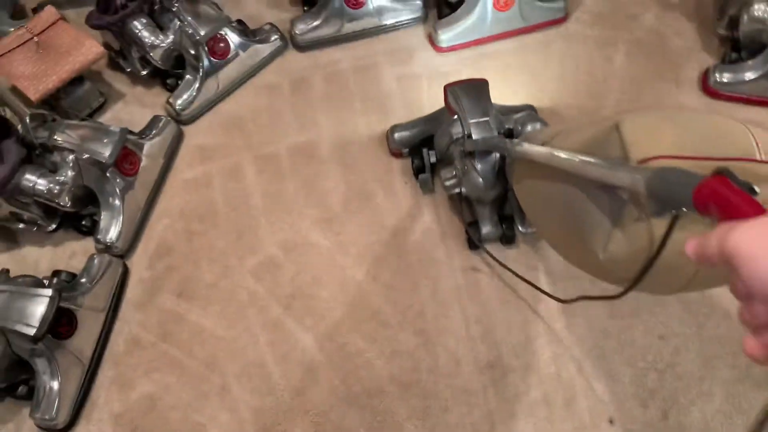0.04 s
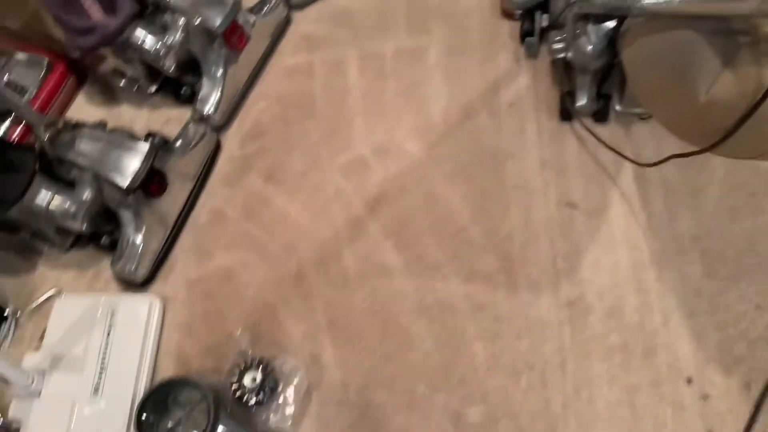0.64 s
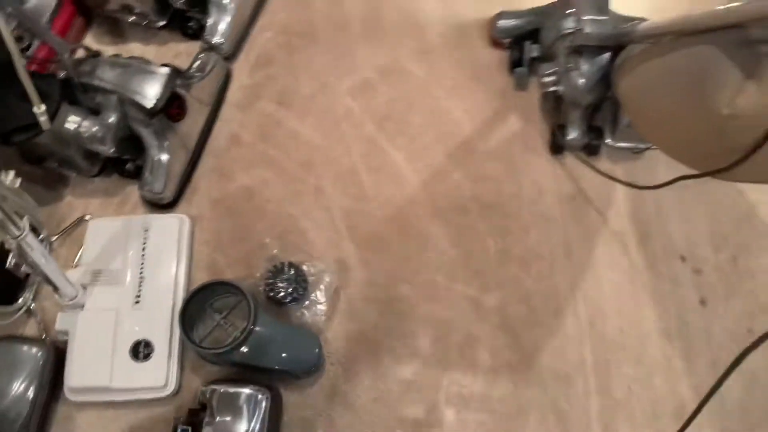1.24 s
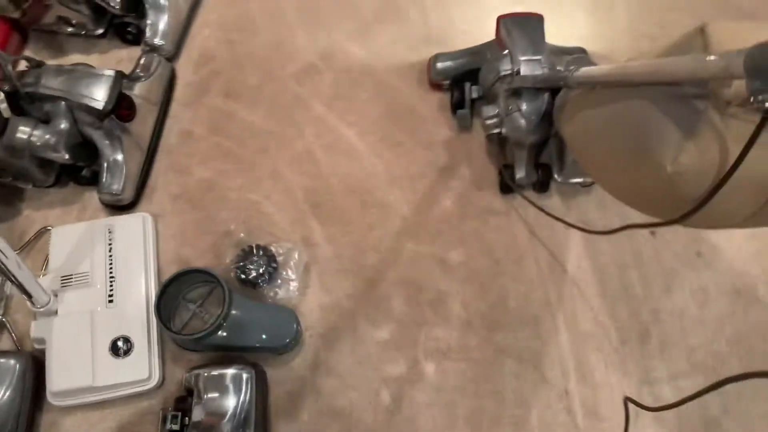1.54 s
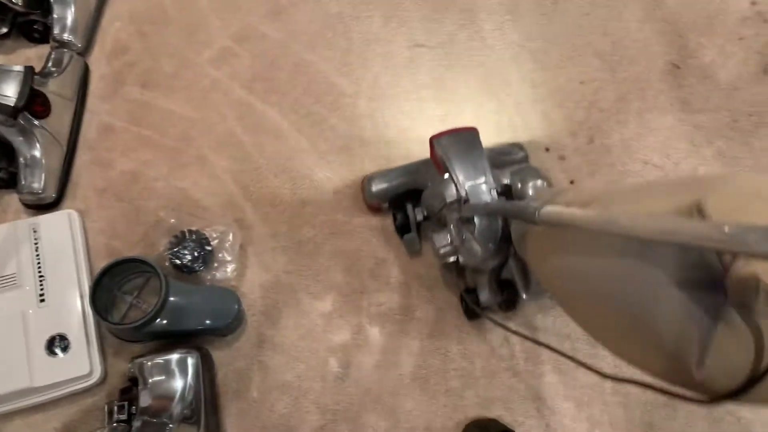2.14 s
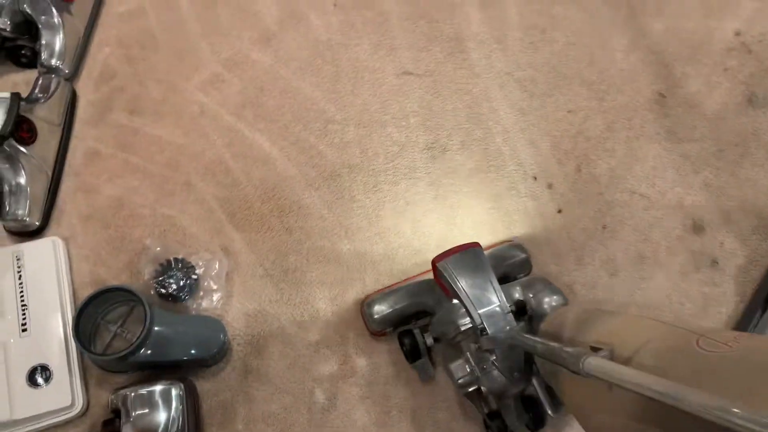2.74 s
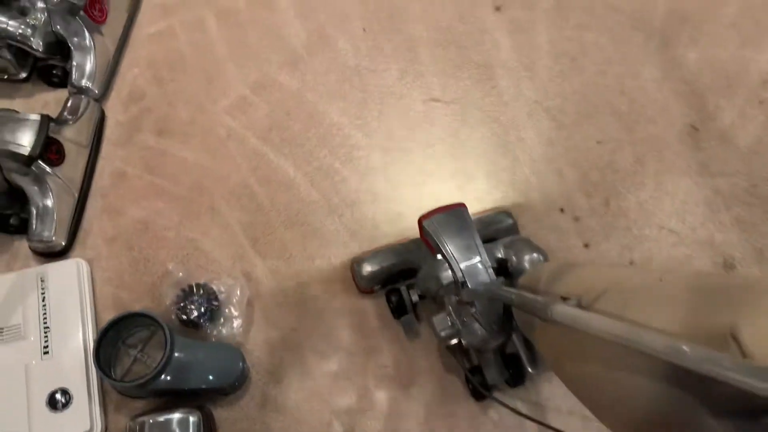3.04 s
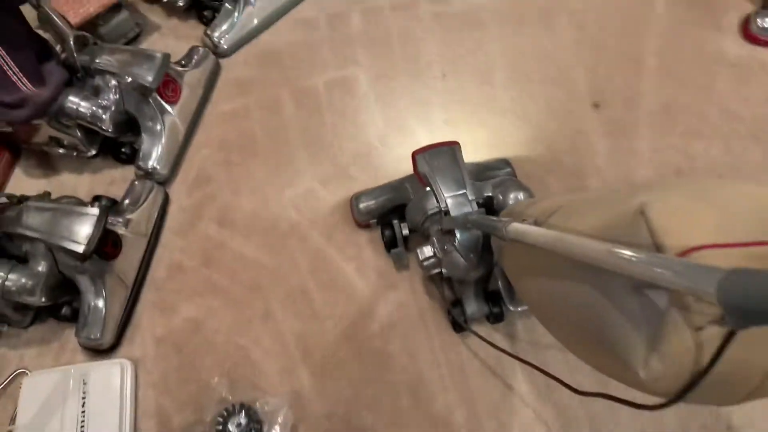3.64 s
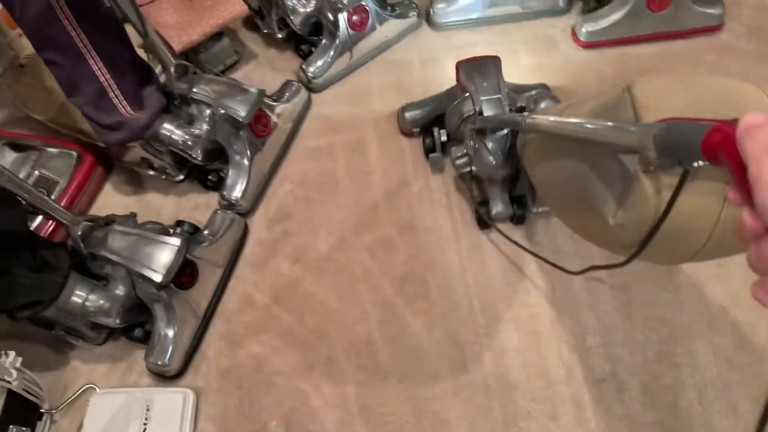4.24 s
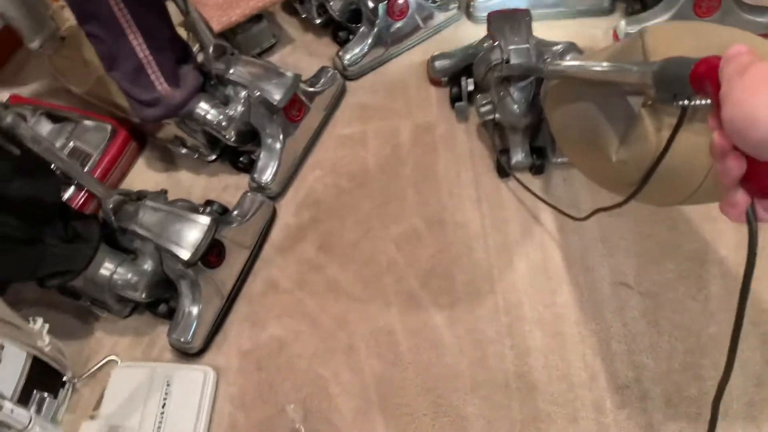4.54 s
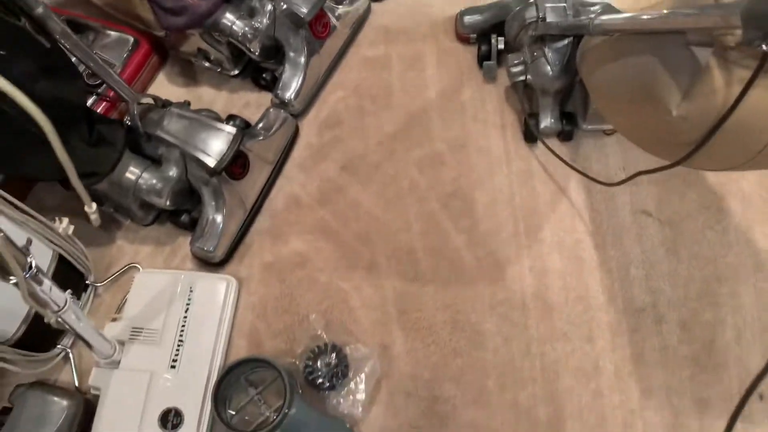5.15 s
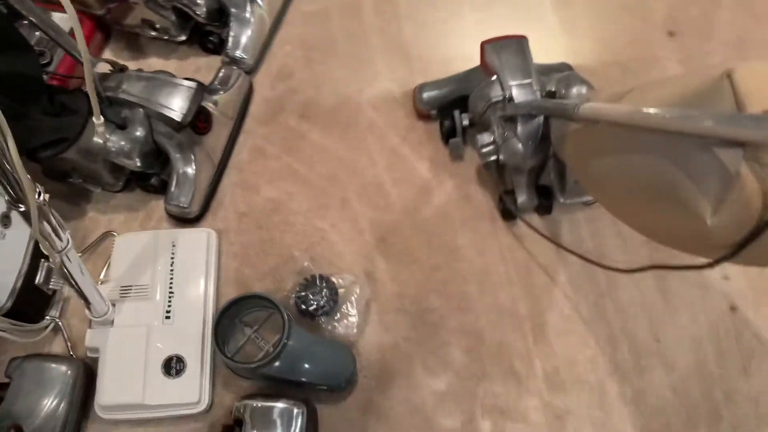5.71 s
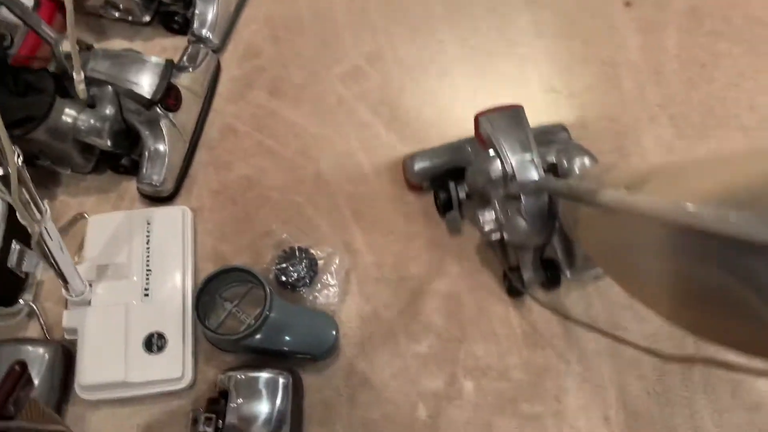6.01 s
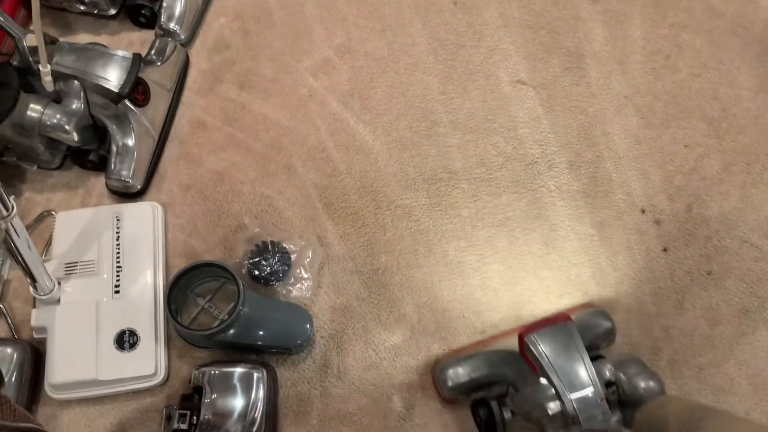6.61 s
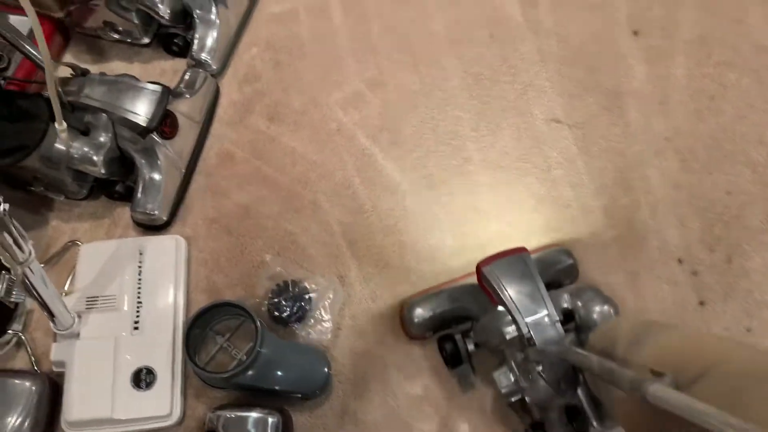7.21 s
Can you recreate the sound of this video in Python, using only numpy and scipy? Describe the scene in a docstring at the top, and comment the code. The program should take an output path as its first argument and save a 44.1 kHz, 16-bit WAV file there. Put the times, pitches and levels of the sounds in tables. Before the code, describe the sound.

An upright vacuum cleaner runs without a break on carpet indoors. A broad roar of rushing air and hiss carries a high, buzzing motor whine, a fan whistle and a faint low hum. The machine is slowly pushed away and drawn back twice; the tones swell and fade and the pitch sags very slightly as it travels. It is heard close up in stereo, from above, where the person steering would stand.

```python
"""An upright vacuum cleaner on carpet, pushed out to arm's length and drawn back to the feet, twice.
Indoors, close up, with a stereo microphone overhead, where the person steering it would hear it.
Air roars through nozzle, fan housing and bag. The motor whines, throbbing with the mains, and slows
a little as the carpet loads it; the fan whistles, shaft and brush roll hum below.
As the machine travels, the room favours other resonances and the tones swell and fade."""
import sys
import numpy as np
from scipy import signal
from scipy.io import wavfile

SR = 44100
rng = np.random.default_rng(int(sys.argv[2]) if len(sys.argv) > 2 else 0)


def materialize(psi):
    """Save the field psi as 16-bit PCM at rate SR to the path in sys.argv[1].

    A 1-D psi becomes a single channel; in a 2-D psi each row is a channel.
    """
    bounded = np.clip(np.atleast_2d(psi).T, -1, 1)
    quanta = np.round(bounded * 32767).astype(np.int16)
    wavfile.write(sys.argv[1], SR, quanta)


N = 325017
TIME = np.arange(N) / SR
SLOTS, BLADES, MAINS_PULSE_HZ = 14, 10, 120

# turning points of the strokes: (time [s], nearness [0 = at arm's length, 1 = at the feet])
STROKE_TURNS = [(-1.4, .6), (.95, .05), (2.85, .83), (5.15, .02), (6.8, .93), (8.8, .1)]
# the motor labours on the push and races on the way back: (time [s], shaft speed [turns/s])
SHAFT_SPEED = [(0.0, 161.64), (0.61, 162.7), (0.99, 164.07), (1.67, 164.57), (2.56, 163.87), (3.02, 160.98),
               (3.52, 160.7), (4.0, 161.26), (4.37, 161.38), (4.76, 161.81), (5.12, 163.44), (5.58, 164.47),
               (6.01, 164.9), (6.53, 163.98), (7.0, 160.9), (7.37, 160.43)]

# bands of the rush that grow louder or softer along the stroke:
# (centre [Hz], width [Hz], nearness [0..1], gain [dB])
POSITION_BANDS = [(258, 36, 0.66, 6), (279.4, 15.4, 0.22, 7.5), (351, 53, 0.77, 3.5), (410, 21, 0.5, 2),
                  (489, 47, 0.16, 5.5), (556, 49, 0.23, -12), (580, 52, 0.092, 7.5), (552, 36, 0.71, 2),
                  (908, 64, 0.81, -11), (1300, 43, 0.62, 7), (1370, 250, 0.5, -5.5), (2325, 70, 0.64, 8),
                  (2630, 130, 0.43, 9), (3380, 1030, 0.69, 5), (3530, 130, .02, -10),
                  (4285, 100, 0.71, 11.5), (5500, 980, 0.099, -5.5), (7250, 330, 0.51, 3),
                  (7040, 440, 0.81, 10.5)]
# likeness of left and right: alike in the bass, alternately alike and opposed in the treble:
# (frequency [Hz], likeness [-1..1])
STEREO_LIKENESS = [(60, .9), (200, .95), (450, .84), (800, .6), (1800, .55), (3200, .25), (4400, .5),
                   (5600, -.3), (6700, .2), (8300, -.92), (9900, .55), (11400, .8), (13300, -.92),
                   (15200, .75)]
# balance of the air at the microphone: (frequency [Hz], left minus right [dB])
STEREO_BALANCE = [(60, 1.5), (220, -1), (600, -1.1), (1800, -0.7), (3000, 0.5), (4400, -2), (5700, -8.5),
                  (7500, 5), (15000, -2)]

# hum of the shaft: (time [s], relative level [dB])
SHAFT_HUM = [(0.0, -42.5), (0.57, -34), (1.71, -36.5), (2.01, -60), (2.73, -41), (2.83, -65), (3.24, -49),
             (3.63, -33.5), (3.89, -51), (4.33, -33), (4.59, -50.5), (4.88, -35), (6.01, -35), (6.11, -47),
             (7.16, -44.5), (7.37, -35)]
# hum of the brush roll, louder close up: (far level [dB], near level [dB])
BRUSH_ROLL = (-57.5, -51)
# tones of the whirr: (multiple of the shaft speed [x]) each
WHIRR_ORDERS = (8, 9, 12, 13)
# strength of each of those tones: (far level [dB], near level [dB])
WHIRR_LEVELS = [(-49, -46), (-43, -53), (-55, -56), (-57, -59)]
# whistle of the fan: (time [s], blade tone level [dB], octave level [dB])
BLADE_TONES = [(0.0, -50.5, -50), (0.42, -36.5, -52), (1.38, -41, -46), (1.86, -43, -58), (2.52, -46, -39),
               (2.64, -39, -52), (2.94, -56.0, -61), (3.15, -43, -46.5), (4.11, -45, -46), (4.32, -49, -50),
               (4.83, -56, -49), (5.19, -59, -44), (5.46, -38, -51.5), (6.09, -39, -43.5), (6.66, -43, -57),
               (6.81, -60, -63), (7.14, -36.5, -40), (7.36, -42, -47)]

# tone of the armature slots: (time [s], mid level [dB], side level [dB])
SLOT_TONE = [(0.0, -37.0, -40.0), (0.06, -28.5, -36.5), (0.18, -34.0, -33.0), (0.27, -45.5, -47.0),
             (0.54, -33.5, -41.0), (0.69, -31.0, -47.5), (0.96, -41.5, -41.0), (1.11, -40.5, -46.5),
             (1.17, -31.0, -31.0), (1.23, -27.5, -33.5), (1.35, -44.0, -36.5), (1.41, -32.0, -32.5),
             (1.5, -42.0, -43.5), (1.56, -34.0, -41.5), (1.62, -46.0, -38.5), (1.68, -35.5, -45.5),
             (2.01, -42.0, -38.5), (2.07, -28.5, -44.0), (2.16, -31.5, -47.0), (2.25, -43.0, -37.5),
             (2.34, -29.0, -37.5), (2.58, -28.0, -42.0), (2.7, -49.5, -39.0), (2.91, -37.0, -37.5),
             (2.97, -42.0, -42.5), (3.06, -34.5, -38.5), (3.27, -28.5, -41.5), (3.33, -39.0, -35.0),
             (3.39, -27.5, -36.0), (3.48, -35.5, -36.5), (3.57, -29.5, -40.0), (3.72, -38.5, -28.5),
             (3.87, -29.5, -30.0), (3.93, -40.0, -37.5), (3.99, -28.0, -39.0), (4.11, -37.0, -39.5),
             (4.2, -31.5, -50.0), (4.26, -42.0, -42.0), (4.35, -30.5, -35.0), (4.41, -29.5, -49.0),
             (4.5, -36.0, -39.0), (4.92, -30.0, -36.5), (5.04, -44.5, -37.0), (5.1, -36.0, -38.5),
             (5.31, -46.0, -35.5), (5.37, -39.0, -43.0), (5.52, -34.0, -35.5), (5.7, -41.0, -40.5),
             (5.85, -32.0, -35.5), (6.06, -35.5, -39.0), (6.15, -27.0, -38.0), (6.21, -34.0, -43.5),
             (6.42, -34.5, -32.5), (6.72, -42.5, -37.5), (7.02, -36.5, -33.0), (7.17, -51.0, -33.0),
             (7.26, -36.5, -29.0), (7.36, -46.0, -31.0)]
# its first mains sideband above, just as strong: (time [s], mid level [dB], side level [dB])
UPPER_SIDEBAND = [(0.0, -46.0, -42.0), (0.42, -30.5, -39.0), (0.6, -40.5, -38.5), (0.75, -29.0, -40.5),
                  (0.87, -38.0, -29.5), (1.02, -43.5, -30.5), (1.11, -35.0, -39.5), (1.32, -44.0, -44.0),
                  (1.5, -35.0, -46.5), (1.56, -41.5, -43.5), (1.71, -30.5, -40.5), (1.92, -42.5, -43.5),
                  (1.95, -30.5, -36.0), (2.07, -26.0, -33.0), (2.34, -31.0, -35.5), (2.43, -39.0, -36.0),
                  (2.61, -31.5, -36.5), (2.73, -42.5, -49.0), (2.79, -33.0, -43.5), (2.88, -39.0, -44.0),
                  (2.94, -32.0, -45.5), (3.06, -33.0, -33.0), (3.18, -39.5, -35.0), (3.36, -35.0, -50.0),
                  (3.42, -32.0, -33.5), (3.51, -43.5, -44.0), (3.63, -30.5, -44.0), (3.81, -29.5, -46.5),
                  (3.9, -47.0, -44.5), (4.14, -41.0, -37.0), (4.2, -29.5, -44.5), (4.29, -43.5, -41.5),
                  (4.41, -32.0, -43.5), (4.74, -43.0, -43.0), (5.07, -42.5, -35.5), (5.25, -45.0, -47.0),
                  (5.37, -31.0, -39.0), (5.46, -38.0, -32.5), (5.58, -38.0, -48.0), (5.73, -32.0, -42.5),
                  (5.79, -35.0, -47.5), (6.0, -31.5, -35.5), (6.15, -41.5, -40.0), (6.27, -33.5, -33.0),
                  (6.48, -31.0, -41.5), (6.75, -43.5, -44.5), (6.87, -36.0, -42.5), (6.96, -50.5, -38.5),
                  (7.23, -35.0, -34.5), (7.36, -49.5, -43.5)]
# its second sideband above: (time [s], level [dB])
OUTER_SIDEBAND = [(0.0, -55), (0.21, -38), (0.69, -38), (0.81, -53), (1.02, -51), (1.14, -54), (1.77, -45),
                  (2.58, -52), (3.33, -34), (3.6, -51.5), (3.69, -44.5), (3.84, -53), (4.11, -44.5),
                  (4.53, -55), (4.83, -59), (4.92, -52), (5.13, -46), (5.64, -44), (6.0, -51), (6.66, -55),
                  (6.87, -50), (7.36, -59)]
# its sideband below: (time [s], level [dB])
LOWER_SIDEBAND = [(0, -45), (1.35, -48), (2.19, -38), (2.4, -39), (2.8, -41), (4, -46), (4.6, -58),
                  (5, -45), (5.7, -48), (6.2, -52), (7.37, -64)]
# its octave: (time [s], relative level [dB])
SLOT_OCTAVE = [(0.0, -41.5), (0.66, -44.0), (0.72, -52.0), (0.93, -39.0), (0.99, -47.5), (1.71, -41.0),
               (1.98, -47.0), (2.22, -40.0), (2.52, -52.0), (2.91, -50.5), (2.97, -41.0), (3.33, -55.0),
               (3.42, -44.5), (3.96, -41.0), (4.05, -49.0), (4.2, -36.5), (4.41, -45.0), (4.5, -40.0),
               (5.19, -45.0), (5.55, -40.0), (5.82, -42.5), (6.66, -55.0), (6.78, -45.5), (6.93, -51.0),
               (7.02, -43.0), (7.36, -52.5)]
# its harmonics 3 and 4: (far level [dB], near level [dB], sidebands against the harmonic [dB])
SLOT_HARMONICS = [(-55.5, -51.5, -5), (-56, -57, -6)]

# rushing air before any resonance: (frequency [Hz], far level [dB per Hz], near level [dB per Hz])
AIR_SPECTRUM = [(25, -98, -95), (60, -70.5, -77), (116, -75, -61.5), (147.5, -57, -63.5),
                (336, -51.5, -52.5), (634, -52.5, -52.5), (680, -58, -63.5), (2300, -64, -65),
                (3180, -67.5, -76), (6000, -71.5, -78.5)]
# its top, thinning out evenly: (frequency [Hz], far level [dB per Hz], near level [dB per Hz])
AIR_TOP = [(7500, -77, -76.5), (11000, -77, -78.5), (15500, -82, -82.5)]
# swell of the roar, the low part of the air: (time [s], gain [dB])
ROAR_SWELL = [(0.0, -3.1), (0.55, -2.5), (1.3, 1), (1.7, 0.8), (2.3, 2.5), (2.7, 0.1), (3.4, 0.1),
              (4.3, -1.5), (4.9, 1.3), (5.35, -1.5), (5.7, 0.5), (6.35, 2), (7.0, -2), (7.37, 1.5)]
# resonances of housing and room, shifting with distance:
# (far centre [Hz], near centre [Hz], width [Hz], far gain [dB], near gain [dB])
MOVING_RESONANCES = [(266, 227, 36, 2.5, 1.5), (320, 279, 22, -1, -10.5), (378, 440, 63, 7.5, -0.5),
                     (438, 441.6, 36.4, 5.5, 9.5), (615, 556, 69, -1, 8.5), (843, 717, 125, 0.1, 7),
                     (1014, 936, 113, 6.5, 12.5), (1250, 1297, 170, 10, 10), (1429, 1483, 106, 11.5, -0.5),
                     (1577, 1514, 105, 6.5, 6), (1847, 1810, 75, 10.5, 1), (2090, 2140, 86, 2.5, 12),
                     (3180, 3060, 260, 2.2, 3.5), (4800, 4350, 1120, 4.5, 4), (6191, 6330, 600, 1.2, 5.5)]
# three housing resonances that swell and fade on their own: (centre [Hz], width [Hz])
HOUSING_BANDS = [(775, 69), (968, 140), (1430, 370)]
# their swell: (time [s], low gain [dB], middle gain [dB], high gain [dB])
HOUSING_SWELL = [(0, -3, 1, 4.5), (.6, -5, 6, 1.5), (1.15, 5.5, -5.5, -1), (1.8, -2, 3.5, 3.5),
                 (2.3, 2, 1.5, -1), (2.9, 5, 8.5, -1), (3.4, 0, 2.5, -3), (3.95, 5, 6, 3),
                 (4.4, -10, -5, 1), (5.0, 4, 1, 2), (5.7, 1, -0.5, -1.5), (6.3, 4.5, -0.5, 2),
                 (6.9, 3, -1, -3), (7.37, 4, -2.5, -2)]
# two drones in the roar that come and go as the machine moves about: (centre [Hz], width [Hz])
DRONE_BANDS = [(268, 70), (447, 55)]
# swell of the lower drone: (time [s], gain [dB])
LOW_DRONE = [(0, 1.5), (.7, 5), (1.5, -3), (3, -1.5), (4.3, -0.7), (7.37, -1)]
# swell of the upper drone: (time [s], gain [dB])
HIGH_DRONE = [(0, 2.5), (2.05, -1), (2.5, -5.5), (3.4, -1.5), (4, 0), (6.5, 0.5), (7.37, 0.5)]


def from_db(db):
    """Decibels to gain."""
    return 10 ** (np.asarray(db) / 20)


def in_time(rows, t=TIME):
    """The columns of a curve, joined by straight lines."""
    times, *columns = np.transpose(rows)
    return [np.interp(t, times, column) for column in columns]


def at_hz(rows, hz):
    """The columns of a spectrum, joined on a log-frequency axis."""
    points, *columns = np.transpose(rows)
    return [np.interp(np.log(hz + 1), np.log(points), column) for column in columns]


def blend(far, near, nearness):
    """A value between its far and its near state."""
    return far + (near - far) * nearness


def bell(x, centre, width):
    """The rounded shape of a resonance, 1 on top."""
    return np.exp(-(2 * (x - centre) / width) ** 2)


def drift(rate_hz, hop=100, settle=1000):
    """A slow random wander with spread 1."""
    pole = np.exp(-2 * np.pi * hop * rate_hz / SR)
    noise = rng.standard_normal(N // hop + settle + 2)
    slow = signal.lfilter([1], [1, -2 * pole, pole * pole], noise)[settle:]
    return np.interp(np.arange(N) / hop, np.arange(len(slow)), slow / slow.std())


def sine(turns):
    """A sine of rms 1 that follows a count of cycles."""
    return np.sqrt(2) * np.sin((2 * np.pi * (turns % 1)).astype(np.float32))


def stroke(t=TIME):
    """Nearness to the microphone: the arm eases out of one turning point and into the next."""
    times, nearness = np.transpose(STROKE_TURNS)
    index = np.arange(len(times))
    leg, part = np.divmod(np.interp(t, times, index), 1)
    eased = (1 - np.cos(np.pi * part)) / 2
    return np.interp(leg + eased, index, nearness)


def reflections(hz, nearness, count=10):
    """Echoes off walls and things on the floor comb the treble; their paths change with distance."""
    paths = rng.random((count, 2))
    delays_s = .002 + .016 * paths[:, 0]
    shifts_s = .003 * (2 * paths[:, 1] - 1)
    strength = .3 * hz ** 2 / (hz ** 2 + 1700 ** 2)
    echoes = sum(np.exp(-2j * np.pi * hz * (delay + shift * nearness))
                 for delay, shift in zip(delays_s, shifts_s))
    return np.abs(1 + strength * echoes) / np.sqrt(1 + count * strength ** 2)


def room_tone(turns, echo, fade_hz):
    """A moving tone reaches the microphone with echoes that add and cancel, differently left and right."""
    direct, shifted = sine(turns), sine(turns + 1 / 4)
    channels = [direct + echo * (drift(fade_hz) * direct + drift(fade_hz) * shifted) for _ in range(2)]
    return np.array(channels) / np.sqrt(1 + 2 * echo ** 2)


def mid_side_tone(turns, levels):
    """A tone in stereo: a mid part in both channels and an opposed side part whose phase wanders."""
    mid_db, side_db = in_time(levels)
    mid = from_db(mid_db) * sine(turns)
    side = from_db(side_db) * sine(turns + .2 * drift(2))
    return np.array([mid + side, mid - side])


def wandering_pan(left_db, swing_db=3.5, rate_hz=3):
    """Gains that move a tone between left and right at constant power."""
    gains = from_db((left_db / 2 + swing_db * drift(rate_hz)) * np.array([[1], [-1]]))
    return gains / np.sqrt(np.mean(gains ** 2, axis=0))


def commutator(shaft, level_db=-68, flicker_db=2.5):
    """Uneven commutator bars repeat with every turn: a faint, flickering comb of high shaft multiples."""
    return sum(from_db(level_db + flicker_db * drift(4)) * sine(order * shaft + rng.random((2, 1)))
               for order in range(37, 72))


def whirr(shaft, nearness):
    """Lesser multiples of the shaft's turn flicker in the housing's resonances."""
    return sum(from_db(blend(far_db, near_db, nearness)) * room_tone(order * shaft, echo=1, fade_hz=8)
               for order, (far_db, near_db) in zip(WHIRR_ORDERS, WHIRR_LEVELS))


def hum(shaft, nearness, shaft_gain_db=-1.0):
    """Dead centre: unbalance of the shaft, and of the brush roll that the belt turns at half its speed."""
    motor = from_db(in_time(SHAFT_HUM)[0] + shaft_gain_db) * sine(shaft + .13 * drift(2.6))
    roll = from_db(blend(*BRUSH_ROLL, nearness)) * sine(shaft / 2 + .073 * drift(2))
    return motor + roll


def fan(shaft, third_harmonic_db=-54):
    """The fan blades pass the outlet and whistle, with two overtones."""
    levels_db = in_time(BLADE_TONES) + [third_harmonic_db]
    return sum(from_db(level_db) * room_tone(harmonic * BLADES * shaft, echo=1, fade_hz=7.4)
               for harmonic, level_db in enumerate(levels_db, 1))


def whine_overtones(shaft, nearness, octave_gains_db=(1, -4, -16)):
    """Each overtone of the slot tone has mains sidebands, weaker with each step out, never quite in step."""
    slot, mains = SLOTS * shaft, MAINS_PULSE_HZ * TIME
    octave_db, = in_time(SLOT_OCTAVE)
    out = 0
    for step in range(-2, 3):
        line = room_tone(2 * slot + step * mains + .11 * drift(1.5), echo=.35, fade_hz=4)
        out += from_db(octave_db + octave_gains_db[abs(step)]) * line * wandering_pan(left_db=-.5)
    for harmonic, (far_db, near_db, sideband_db) in enumerate(SLOT_HARMONICS, 3):
        for step in (-1, 0, 1):
            line = room_tone(harmonic * slot + step * mains, echo=1, fade_hz=6)
            out += from_db(blend(far_db, near_db, nearness) + sideband_db * abs(step)) * line
    return out


def whine(shaft):
    """The armature slots sing; the pulsing mains current adds sidebands that make the tone buzz."""
    slot, mains = SLOTS * shaft, MAINS_PULSE_HZ * TIME
    # the path to the microphone changes, not alike for tone and sideband: the buzz comes and goes
    tone = mid_side_tone(slot + .12 * drift(2), SLOT_TONE)
    upper = mid_side_tone(slot + mains + .3 * drift(1), UPPER_SIDEBAND)
    lower = from_db(in_time(LOWER_SIDEBAND)[0]) * room_tone(slot - mains, echo=.5, fade_hz=4)
    outer = from_db(in_time(OUTER_SIDEBAND)[0]) * room_tone(slot + 2 * mains, echo=.3, fade_hz=4)
    return tone + upper + lower + outer


def pulse_hiss(rush, edge_hz=4000, depth=.1, flutter_db=.45):
    """The top of the rush, hiss of the motor's brushes, swells with each mains half wave and flutters."""
    hiss = signal.sosfiltfilt(signal.butter(2, edge_hz, "high", fs=SR, output="sos"), rush)
    flutter = from_db(flutter_db * drift(14))
    swell = (1 + depth * np.cos(2 * np.pi * MAINS_PULSE_HZ * TIME)) * flutter
    return rush + hiss * (swell - 1)


def resonances_db(hz, t, nearness, band_reach=.44):
    """Housing and room colour the rush; some bands grow louder or softer over part of the stroke."""
    gain_db = 0
    for far_hz, near_hz, width, far_db, near_db in MOVING_RESONANCES:
        centre = blend(far_hz, near_hz, nearness)
        gain_db += blend(far_db, near_db, nearness) * bell(hz, centre, width)
    swells_db = in_time(HOUSING_SWELL, t) + in_time(LOW_DRONE, t) + in_time(HIGH_DRONE, t)
    for (centre, width), swell_db in zip(HOUSING_BANDS + DRONE_BANDS, swells_db):
        gain_db += swell_db * bell(hz, centre, width)
    for centre, width, place, band_db in POSITION_BANDS:
        gain_db += band_db * bell(hz, centre, width) * bell(nearness, place, band_reach)
    return gain_db


def rushing_air(crossover_hz=910, surge_db=1.28, surge_hz=4.9, hiss_db=-1.93, gain_db=-.15, frame=4096):
    """Turbulence in nozzle, fan housing and bag: a surging roar below the crossover, steadier hiss above."""
    hz, t, (mid, side) = signal.stft(rng.standard_normal((2, N)), SR, nperseg=frame)
    hz, nearness = hz[:, None], stroke(t)
    treble = hz / (hz + crossover_hz)
    roar_db = in_time(ROAR_SWELL, t)[0] + surge_db * np.interp(t, TIME, drift(surge_hz))
    level_db = blend(*at_hz(AIR_SPECTRUM + AIR_TOP, hz), nearness) + resonances_db(hz, t, nearness)
    level_db += roar_db * (1 - treble) + hiss_db * treble + gain_db
    likeness, = at_hz(STEREO_LIKENESS, hz)
    pan_db, = at_hz(STEREO_BALANCE, hz)
    mid, side = mid * np.sqrt(1 + likeness), side * np.sqrt(1 - likeness)
    left_lag = np.exp(-2j * np.pi * hz * .00007 * (1 - treble))   # the machine is a little to the right
    left = (mid + side) * left_lag * from_db(pan_db / 2)
    right = (mid - side) * from_db(-pan_db / 2)
    spectrum = np.array([left, right]) * from_db(level_db) * reflections(hz, nearness)
    return signal.istft(spectrum, SR, nperseg=frame)[1][:, :N] * np.sqrt(SR) / 2


def scene():
    """The machine below the microphone: one shaft drives every tone, and the air rushes around them."""
    nearness = stroke()
    speed = in_time(SHAFT_SPEED)[0] * (1 + .00035 * drift(25))
    shaft = np.cumsum(speed) / SR   # turns so far
    tones = whine(shaft) + whine_overtones(shaft, nearness) + fan(shaft)
    tones += whirr(shaft, nearness) + commutator(shaft)
    return pulse_hiss(rushing_air()) + tones + hum(shaft, nearness)


def record(dry, low_cut_hz=36, high_cut_hz=15900):
    """The microphone loses the lowest rumble; the top is cut steeply."""
    dry = signal.sosfilt(signal.butter(3, low_cut_hz, "high", fs=SR, output="sos"), dry)
    return signal.sosfilt(signal.ellip(10, .1, 80, high_cut_hz, fs=SR, output="sos"), dry)


dry = scene()
out = record(dry)
materialize(out)
```